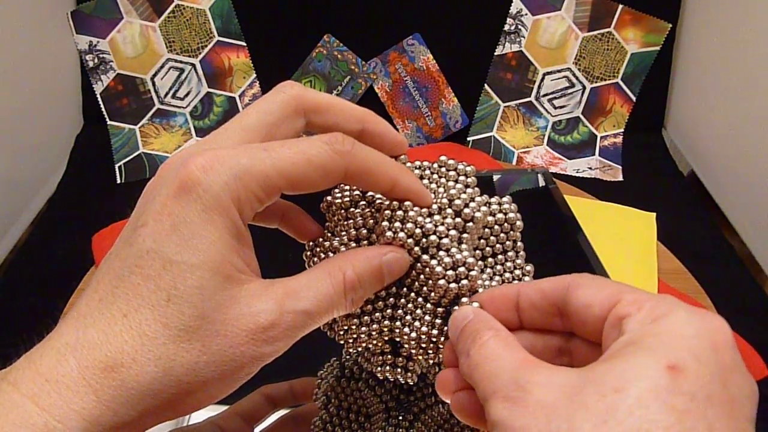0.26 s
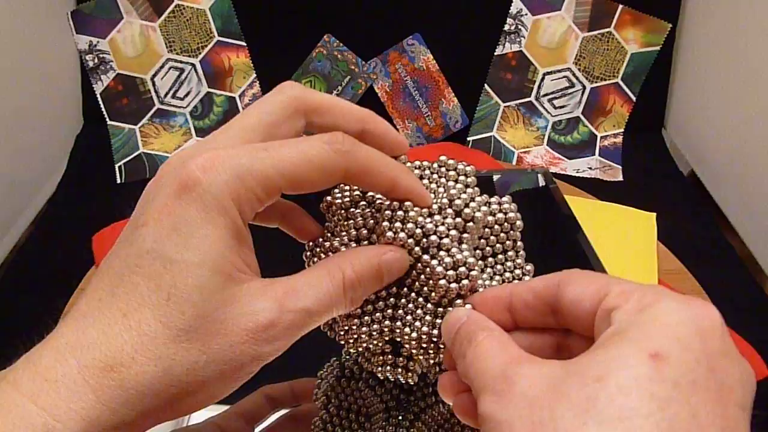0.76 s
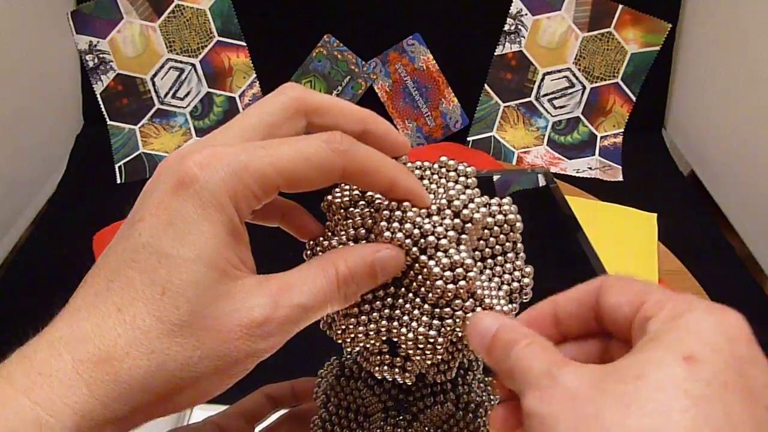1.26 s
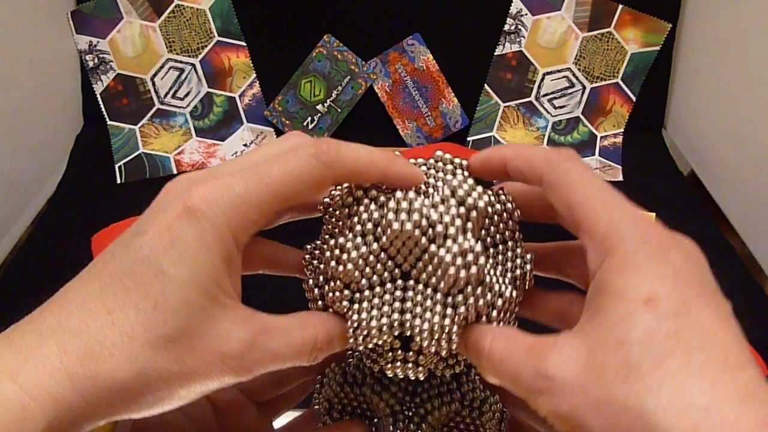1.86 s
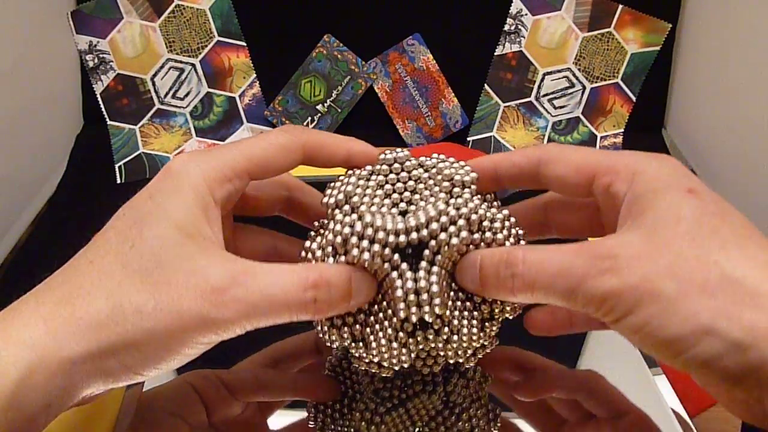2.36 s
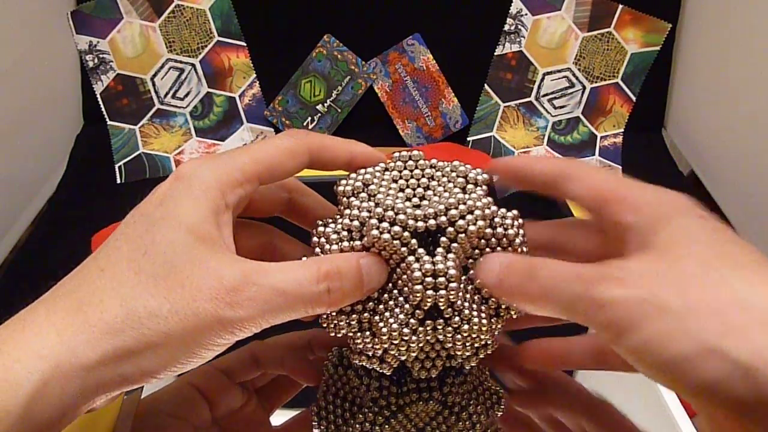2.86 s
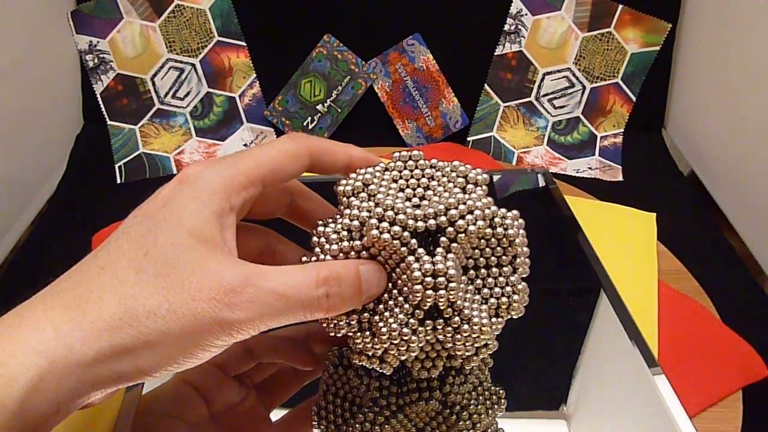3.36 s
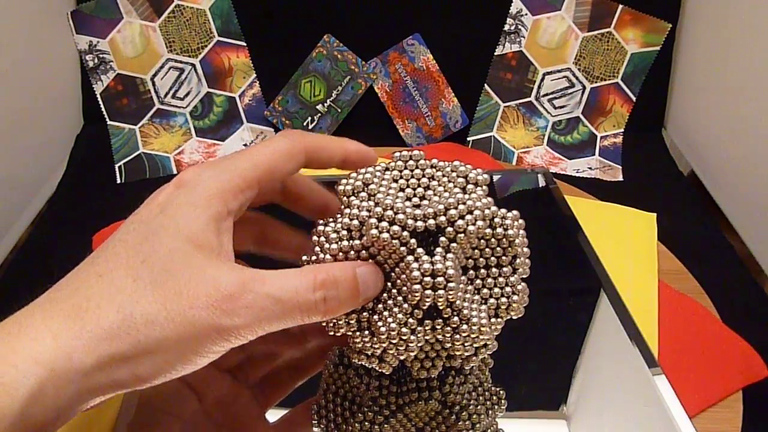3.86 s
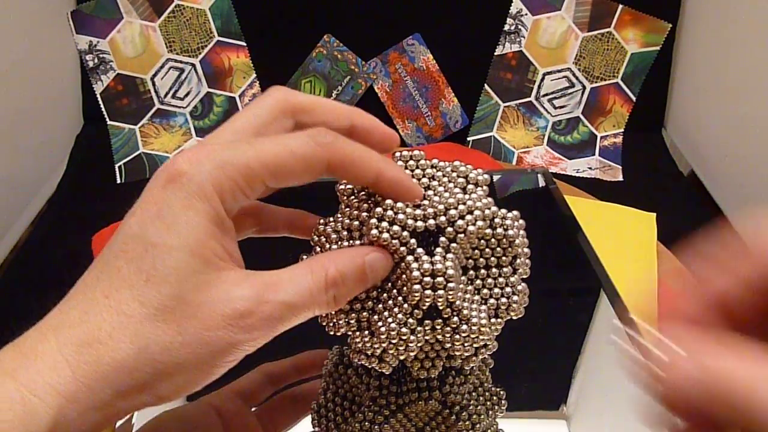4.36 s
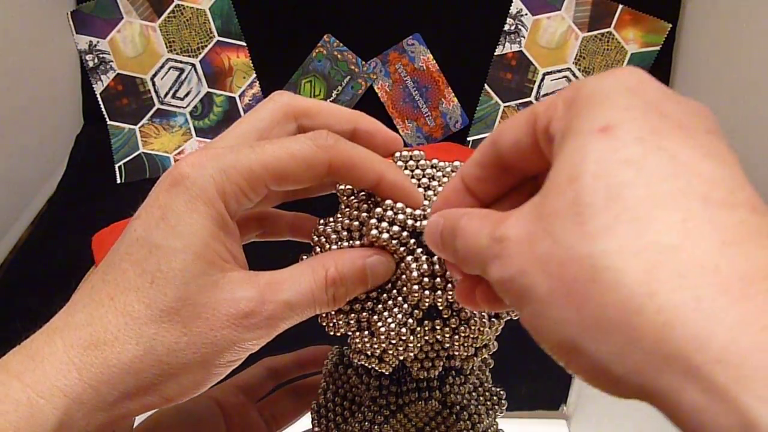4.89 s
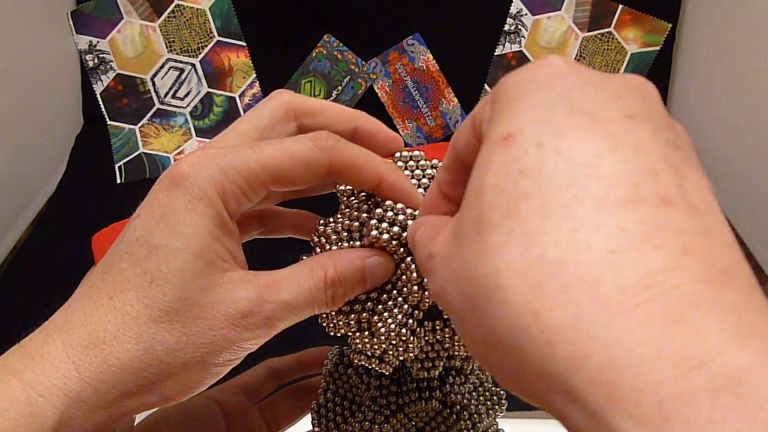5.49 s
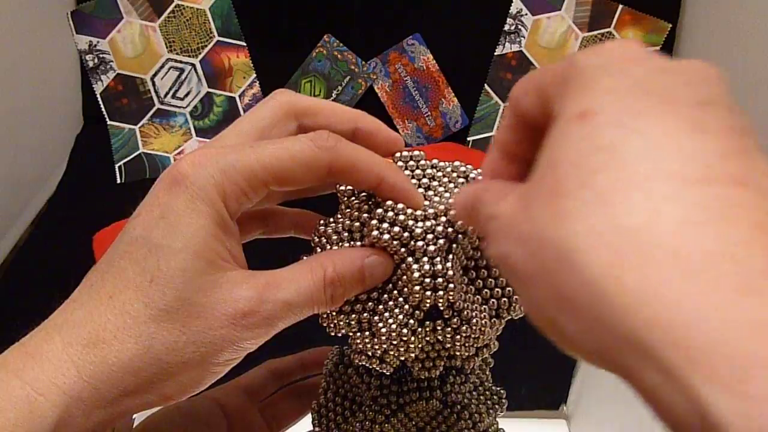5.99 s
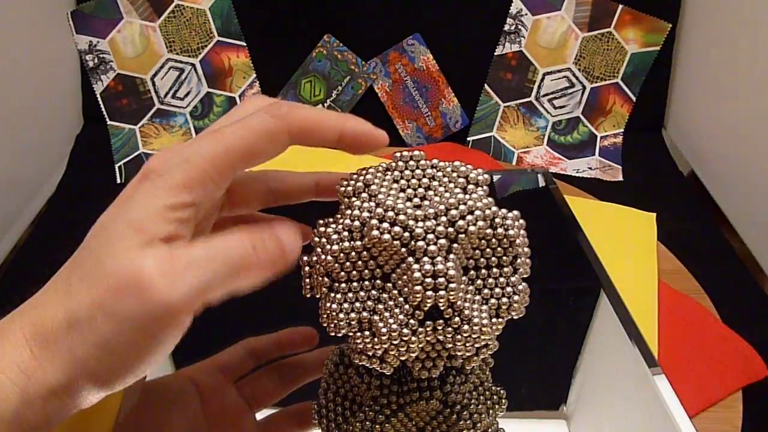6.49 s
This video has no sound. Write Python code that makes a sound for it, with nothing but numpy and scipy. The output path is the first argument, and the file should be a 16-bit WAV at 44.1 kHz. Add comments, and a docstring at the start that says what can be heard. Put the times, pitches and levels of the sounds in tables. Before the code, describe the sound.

A small magnet ball snaps onto a hollow sculpture of metal balls with a bright click and a dull knock. The sculpture is turned and knocks sharply on its stand several times, ringing briefly. Hands thud and rustle softly on the table, a fingertip squeaks faintly, and more balls tick into place. The microphone is close, in a small room with steady low noise and hiss.

```python
"""A small room, close to a table where two hands work on a hollow sculpture of magnet balls on a mirror.
Loose balls snap onto it with steely ticks; as it is turned it rocks and knocks on its stand, and its
shell rings. Hands thud and rustle on the table, and a fingertip squeaks on the balls. Under it all
lie a low room noise and the hiss and faint whine of the small camera that holds the microphone."""
import sys
import numpy as np
from scipy import signal
from scipy.fft import rfft, irfft
from scipy.io import wavfile
from scipy.ndimage import uniform_filter1d

SR = 44100
rng = np.random.default_rng(int(sys.argv[2]) if len(sys.argv) > 2 else 0)


def transcribe(u):
    """Save the signal u as a 16-bit wav file named by the first command-line argument.

    u: samples, shape (n,) or (channels, n), limited to [-1, 1]; the rate is SR.
    q: integer samples, one column per channel.
    """
    v = np.clip(np.atleast_2d(u).T, -1, 1)
    q = np.round(v * 32767).astype(np.int16)
    wavfile.write(sys.argv[1], SR, q)


N = 296881
T = np.arange(N) / SR
RING_T = T[:SR // 2]  # time axis of one hit, s


def amp(db):
    """Decibels to gain."""
    return 10 ** (np.asarray(db) / 20)


def unit(x):
    """Scale to rms 1."""
    return x / np.sqrt(np.mean(x ** 2))


def unit_hit(x):
    """Scale a hit to rms 1 over its first 10 ms."""
    return x / np.sqrt(np.mean(x[:SR // 100] ** 2))


def add(out, s, x):
    """Mix x into out from s seconds on."""
    start = int(s * SR)
    out[start:start + len(x)] += x[:N - start]


def bins(x):
    """The frequencies of the spectrum of x, floored at 1 Hz."""
    return np.maximum(np.fft.rfftfreq(len(x), 1 / SR), 1)


def curve(hz, points):
    """Join (Hz, dB) points on a log-frequency axis."""
    f, db = np.transpose(points)
    return np.interp(np.log(hz), np.log(f), db)


def shape(x, db):
    """Minimum-phase filter with the given gain at each frequency bin."""
    cepstrum = irfft(db * np.log(10) / 20, len(x))
    cepstrum[1:len(x) // 2] *= 2
    cepstrum[len(x) // 2:] = 0
    return irfft(rfft(x) * np.exp(rfft(cepstrum)), len(x))


def resonance(hz, centre_hz, width_hz):
    """Complex response of one mode, gain 1 at its centre."""
    return 1 / (1 + 1j * (hz ** 2 - centre_hz ** 2) / (hz * width_hz))


def ping(hz, centre_hz, width_share):
    """The give of a contact: a broad peak of height 1, to be scaled in dB."""
    return np.abs(resonance(hz, centre_hz, width_share * centre_hz)) ** 2


def scatter(envelope):
    """Dense random impacts under an envelope, even in spectrum; energy 1."""
    x = envelope * rng.standard_normal(len(envelope))
    for _ in range(4):  # flatten the spectrum, then restore the envelope
        spectrum = rfft(x)
        x = irfft(spectrum / np.abs(spectrum), len(x))
        x = x * envelope / np.sqrt(uniform_filter1d(x ** 2, SR // 500) + 1e-12)
    return x / np.linalg.norm(x)


def clatter(peak_s, first):
    """A first contact, then a run of impacts from ball to ball that swells and dies."""
    t = RING_T[:4096]
    x = scatter(t / peak_s * np.exp(-t / peak_s))
    x[0] += first
    return np.pad(x / np.linalg.norm(x), (0, len(RING_T) - len(x)))


def room(x, near_db, near_s, wet_db, t60, treble_db):
    """The microphone hears x direct, then off the mirror and backdrop, then the small room's dull tail."""
    near = scatter((RING_T / near_s) ** 2 * np.exp(-RING_T / near_s))
    build_up = 1 - np.exp(-(RING_T / 0.0058) ** 2)
    tail = scatter(np.exp(-np.log(1000) * RING_T / t60) * build_up)
    colour = curve(bins(tail), [(300, -0.44), (1000, 0.52), (2500, -0.29), (7000, treble_db)])
    echoes = shape(amp(near_db) * near + amp(wet_db) * tail, colour)
    return x + signal.fftconvolve(x, echoes)[:len(x)]


def background(air_db=-52, hum_hz=120, hum_db=-66):
    """Steady room tone and hiss, a little mains hum, and the camera's thin whine at the microphone."""
    # Each row: frequency in Hz, relative noise density in dB.
    air_colour = [(20, -18), (50, -11.5), (90, -6), (120, -3.5), (150, -3), (240, -1), (305, -4.5),
                  (370, -6.5), (1150, -14.5), (2000, -19.5), (4000, -24.5), (7300, -27.5), (8200, -27),
                  (8800, -28)]
    # Each row: frequency in Hz, rms level in dB ahead of the camera's roll-off.
    whine = [(3112, -81), (6223, -83), (6665, -81.5), (7531, -89.5)]
    air = amp(air_db) * unit(shape(rng.standard_normal(N), curve(bins(T), air_colour)))
    tones = sum(amp(db) * np.sqrt(2) * np.sin(2 * np.pi * (hz * T + rng.random()))
                for hz, db in [(hum_hz, hum_db), *whine])
    return air + tones


def hand_brushes(rise_share=0.29, depth_db=20):
    """Close and dry: skin catches and lets go in uneven tugs that the table passes on as a low rustle."""
    # Each row: frequency in Hz, relative level of the rustle in dB.
    rustle_colour = [(40, -37), (90, -9), (135, 1.5), (190, -0.5), (280, 1), (400, -13.5), (580, -6.5),
                     (800, -20), (1500, -25), (4000, -58)]
    # Each row: firmest moment in seconds, seconds spent within depth_db of the peak, peak level in dB.
    strokes = [(2.94, 0.28, -41.5), (3.198, 0.16, -42.5), (3.42, 0.11, -55), (3.809, 0.53, -48),
               (4.347, 0.13, -49.5)]
    grip_db = 2 * np.repeat(rng.standard_normal(N // 200 + 1), 200)[:N]
    tugs = rng.standard_normal(N) * amp(grip_db)
    rustle = unit(shape(tugs, curve(bins(T), rustle_colour)))
    pressure = np.zeros(N)
    for s, length, db in strokes:
        from_peak = np.maximum((s - T) / rise_share, (T - s) / (1 - rise_share)) / length
        pressure += amp(db - depth_db * from_peak)
    return rustle * pressure


def finger_slips(waver=0.066):
    """A fingertip sticks and slips on the balls: a tiny, unsteady squeak."""
    # Each row: start in seconds, length in seconds, pitch in Hz, level in dB.
    squeaks = [(2.853, 0.0088, 1330, -56), (2.872, 0.043, 1260, -56), (2.913, 0.009, 1320, -56),
               (3.352, 0.013, 1160, -48.5)]
    out = np.zeros(N)
    for s, length, pitch_hz, db in squeaks:
        progress = np.linspace(0, 1, int(length * SR))
        drift = unit(uniform_filter1d(rng.standard_normal(N // 100), SR // 500))
        slip_hz = pitch_hz * (1 + waver * drift[:len(progress)])
        swell = np.sin(np.pi * np.sqrt(progress)) ** 2
        add(out, s, amp(db) * unit(swell * np.sin(2 * np.pi * np.cumsum(slip_hz) / SR)))
    return out


def table_bumps(hard_contact_s=0.00014):
    """Blows ring the table's low modes: a long, soft contact only the lowest; a short one adds a tap."""
    # Each row: start in seconds, level in dB, contact time in seconds.
    blows = [(1.118, -42, 0.0051), (2.108, -42.5, 0.005), (2.931, -36.5, 0.0037), (2.9479, -36, 0.0024),
             (2.977, -39, .0018), (2.997, -45.5, .0018), (3.153, -43.5, 0.0085), (3.71, -52.5, 0.015),
             (3.9202, -39.5, 0.00028), (6.6637, -37.5, 0.00016)]
    # Each row: mode frequency in Hz, seconds to decay by 60 dB, weight in dB.
    table_modes = [(78.2, .45, -25.5), (131, 0.22, -14), (293, 0.054, 9.5)]
    out, hz = np.zeros(N), bins(RING_T)
    dull = curve(hz, [(60, -22), (300, 0), (800, 0), (1700, -8), (2200, -17), (4000, -22), (8000, -40)])
    onset = 1 - np.exp(-RING_T / 0.0009)
    for s, db, contact_s in blows:
        ring = sum(amp(mode_db) * np.exp(-(f * contact_s) ** 2 - np.log(1000) * RING_T / t60)
                   * np.sin(2 * np.pi * f * RING_T) for f, t60, mode_db in table_modes)
        thud = unit_hit(np.gradient(ring * onset))  # the sound follows the speed of the table top
        tap = unit_hit(shape(clatter(peak_s=0.0013, first=1.3), dull))
        add(out, s, amp(db) * unit_hit(thud + hard_contact_s / contact_s * tap))
    return out


def shell(push):
    """A push rings the modes of the hollow sculpture and its stand."""
    # Each row: mode frequency in Hz, bandwidth in Hz, gain in dB.
    modes = [(335, 12, -6), (466, 11, 0), (573, 12, 1), (690, 14, -5), (820, 16, -4), (960, 20, -4),
             (1042, 22, 0), (1342, 24, -2), (1680, 16, -8), (1790, 22, -9), (2082, 24, -10),
             (2318, 24, -13), (2490, 18, -14), (2860, 70, -11), (3070, 25, -16), (3410, 35, -15),
             (3668, 35, -13), (4020, 20, -17), (4600, 45, -13), (4840, 35, -16), (5940, 44, -20),
             (6810, 35, -17)]
    hz = bins(push)
    response = sum(amp(db) * resonance(hz, f, width) for f, width, db in modes)
    return irfft(rfft(push) * response, len(push))


def steel_click(length, ping_hz, ping_db, shell_db=5.5):
    """Steel meets steel: a bright rattle with a ping that shakes the shell a little."""
    # Each row: frequency in Hz, gain of the tick in dB.
    tick_colour = [(150, 4), (600, 6.5), (1100, 2), (2000, 1), (4000, 1), (7200, -4), (8400, -3)]
    hz = bins(RING_T)
    push = clatter(peak_s=length / 2, first=0.79)
    in_room = room(push, near_db=-14.5, near_s=0.0054, wet_db=-8.5, t60=0.37, treble_db=-2)
    tick = shape(in_room, curve(hz, tick_colour))
    return unit_hit(shape(tick + amp(shell_db) * shell(push), ping_db * ping(hz, ping_hz, 0.41)))


def ball_snaps(seat_lag_s=0.0024):
    """A ball jumps the last gap with a short, high tick, then rolls into its seat with a longer clack."""
    # Each row: start in seconds, level in dB and ping in Hz of the touch, the same two for the seating,
    # length of the seating clatter in seconds.
    snaps = [(0.65, -67, 5000, -56, 1490, 0.002), (1.1186, -42.5, 5350, -35, 5460, 0.0032),
             (3.752, -58.5, 4500, -60, 3480, 0.014), (3.8993, -50.5, 3950, -46, 1840, 0.0061),
             (5.567, -48.5, 5930, -48, 840, 0.0015), (5.828, -54, 5870, -43.5, 900, 0.0016),
             (5.8799, -47, 6600, -39.5, 1050, 0.0057)]
    out = np.zeros(N)
    for s, touch_db, touch_hz, seat_db, seat_hz, length in snaps:
        add(out, s, amp(touch_db) * steel_click(length / 2, touch_hz, ping_db=16))
        add(out, s + seat_lag_s, amp(seat_db) * steel_click(length, seat_hz, ping_db=13))
    return out


def sculpture_knocks(variation=0.52, shell_db=7):
    """The sculpture drops on its edge: much the same crack fills the room each time; the shell rings on."""
    # Each row: start in seconds, level in dB, treble slope in dB per octave,
    # contact ring in Hz, its boost in dB.
    knocks = [(1.1205, -33, -17.5, 580, 8), (1.1261, -39.5, -15, 1030, 7.5), (2.1083, -26.5, -2, 2900, 0),
              (2.1316, -39, -1, 1300, 4.5), (2.1383, -37, -7, 1020, -2), (2.3303, -30.5, -4.5, 4600, 4),
              (2.4660, -43.5, -3.5, 4600, 1.5), (2.5054, -26.5, -2.5, 1840, 2),
              (2.7170, -29, -3, 3700, 6.5)]
    # Each row: frequency in Hz, gain of the crack in dB.
    crack_colour = [(60, -12), (200, -6.5), (350, -6.5), (570, 1), (720, -5.5), (980, 5), (1200, -4.5),
                    (1380, -0.5), (1550, -4), (1800, -3.5), (2400, -6.5), (3600, -4.5), (6500, -9),
                    (8000, -25)]
    out, hz = np.zeros(N), bins(RING_T)
    treble_octaves = np.log2(np.hypot(1, hz / 1200))
    common_push = clatter(peak_s=0.002, first=0.29)
    for s, db, tilt_db, contact_hz, contact_db in knocks:
        push = common_push + variation * clatter(peak_s=0.0021, first=0)
        in_room = room(push, near_db=-9.5, near_s=0.0031, wet_db=-7.5, t60=0.44, treble_db=-5.5)
        crack = shape(in_room, curve(hz, crack_colour))
        colour = tilt_db * treble_octaves + contact_db * ping(hz, contact_hz, 0.4)
        knock = shape(crack + amp(shell_db) * shell(push), colour)
        add(out, s, amp(db) * unit_hit(knock))
    return out


def scene():
    """In mono: soft handling close to the microphone, hard clicks that wake the room, and room tone."""
    touches = table_bumps() + finger_slips()
    handling = room(touches, near_db=-17.5, near_s=0.0043, wet_db=-13, t60=0.15, treble_db=-4.5)
    handling += hand_brushes()
    return (sculpture_knocks() + ball_snaps() + handling + background())[None]


def record(dry):
    """The camera rolls the treble off to nothing; its converter rests slightly off zero."""
    top_hz, dc_offset = 8000, 0.013
    low_pass = signal.firwin(91, top_hz, window=("kaiser", 8), fs=SR)
    return signal.fftconvolve(dry, low_pass[None], mode="same") + dc_offset


dry = scene()
out = record(dry)
transcribe(out)
```